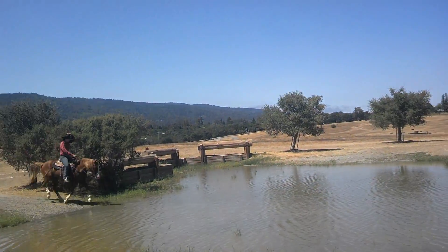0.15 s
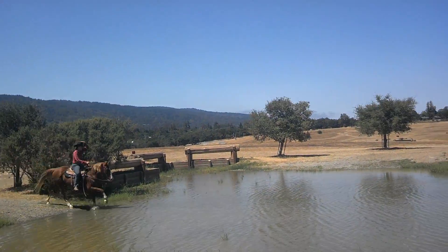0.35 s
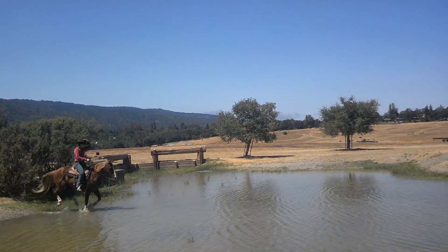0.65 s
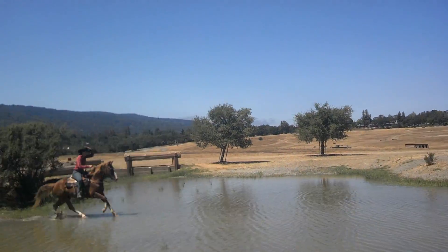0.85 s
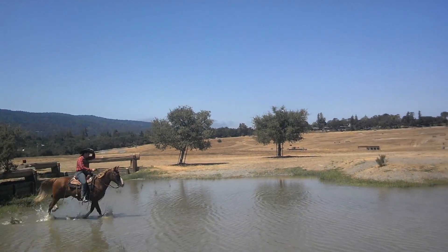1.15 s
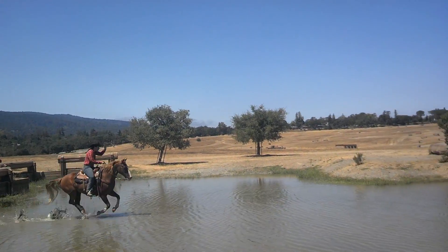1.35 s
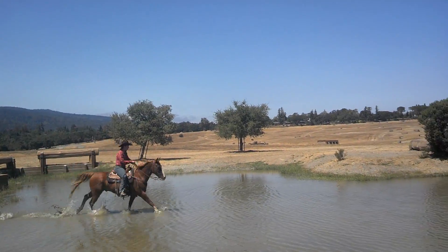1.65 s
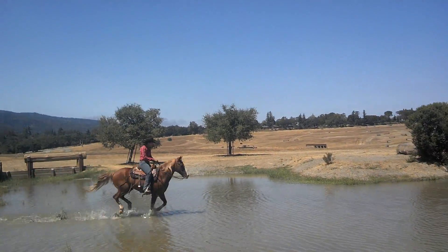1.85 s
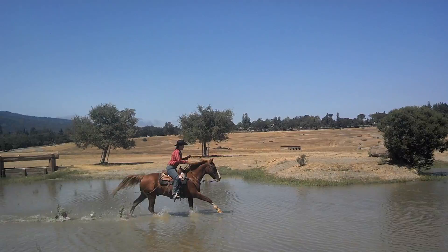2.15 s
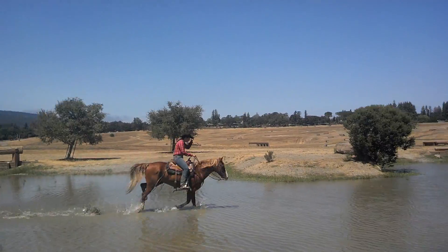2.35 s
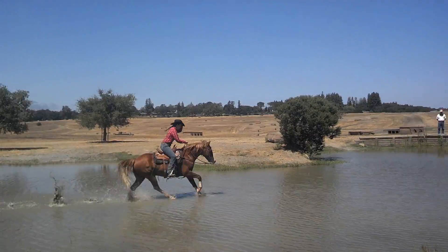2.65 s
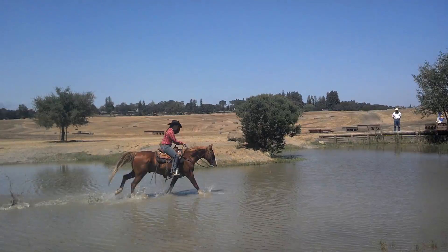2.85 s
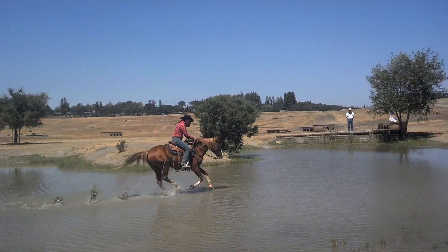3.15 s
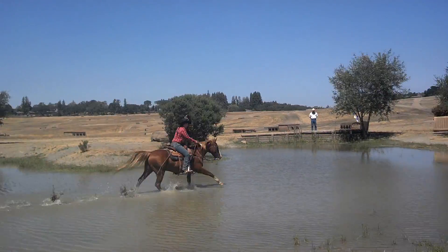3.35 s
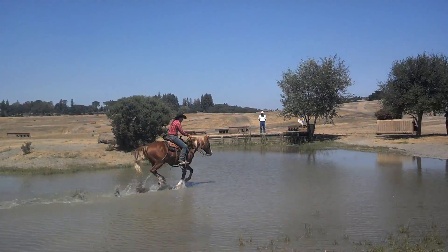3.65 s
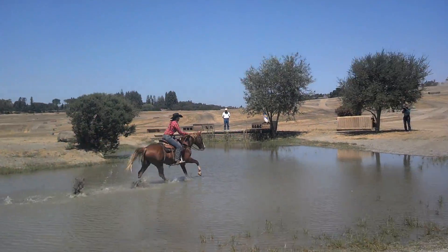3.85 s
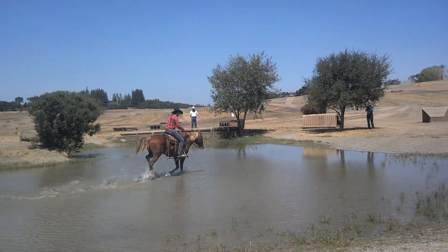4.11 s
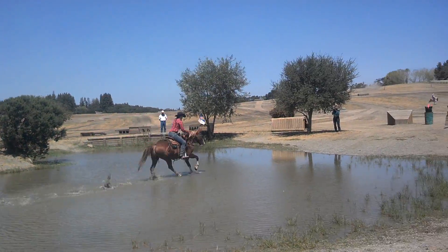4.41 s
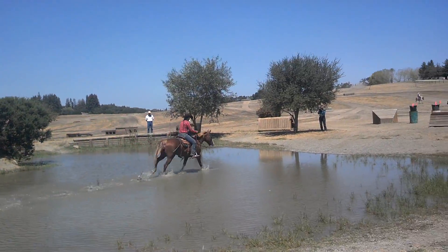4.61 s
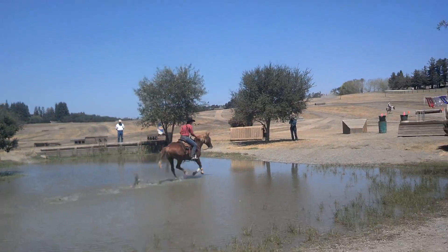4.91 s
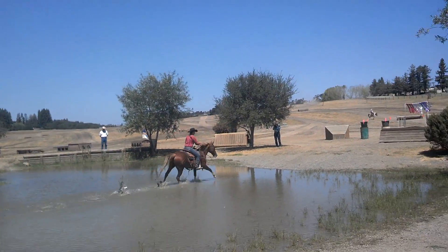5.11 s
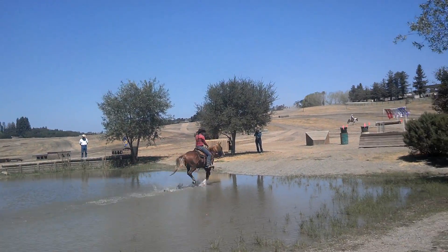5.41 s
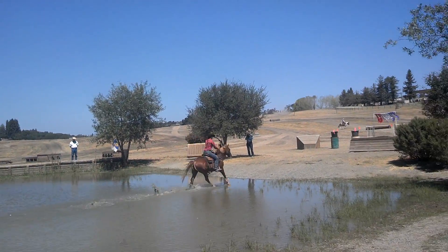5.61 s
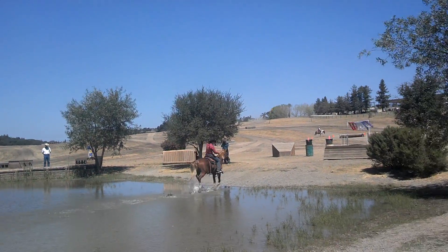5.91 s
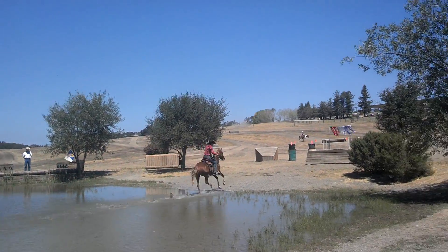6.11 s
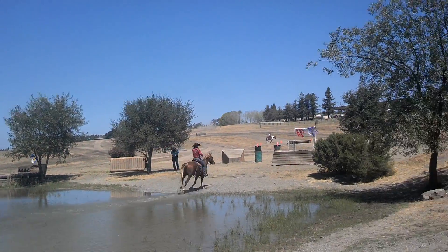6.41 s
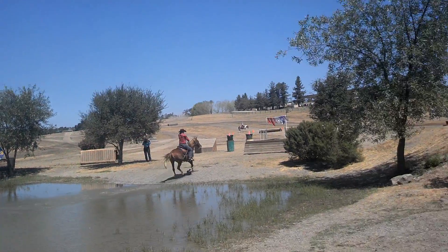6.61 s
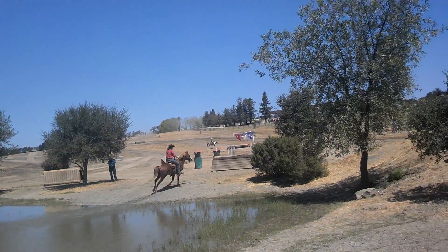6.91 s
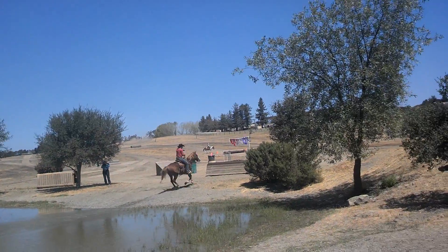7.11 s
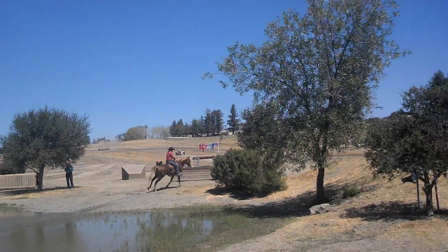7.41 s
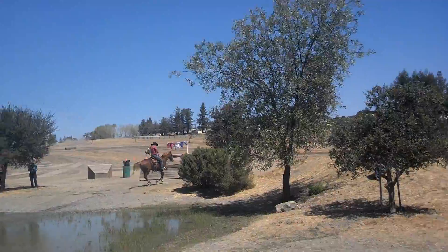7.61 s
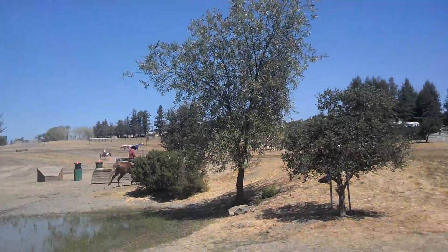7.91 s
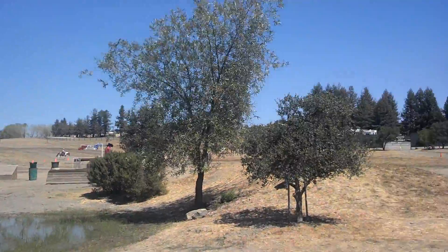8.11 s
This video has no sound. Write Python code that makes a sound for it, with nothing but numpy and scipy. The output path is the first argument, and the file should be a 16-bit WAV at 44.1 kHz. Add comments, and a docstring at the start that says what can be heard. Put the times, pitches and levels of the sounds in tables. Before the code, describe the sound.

Heard from across a pond, hooves thud briefly on the gravel bank, then splash through shallow water with bright cracks, low gulps, dripping bubbles and constant falling droplets. After about six seconds the splashes give way to crunchy gravel steps that soon stop. Low aircraft roar and engine hum persist and grow, with a descending whine. The wide stereo microphone catches small wind buffets.

```python
"""A horse canters through a shallow pond and out over gravel, some way off in an open field.
Hooves slap the water (shaped noise drops), crack flat (short pushes), close air cavities (ringing bubbles);
thrown water rains back as noise and small bubbles. Gravel thuds and crunches before and after the pond.
Behind it a far aircraft (filtered noise, sinking whine) swells over an engine hum, with a brief thin hiss.
Gusts push a two-port microphone, whose stereo is widened by cross-subtraction."""
import sys
import numpy as np
from scipy import signal
from scipy.fft import rfft, irfft, next_fast_len
from scipy.io import wavfile

SR = 44100
rng = np.random.default_rng(int(sys.argv[2]) if len(sys.argv) > 2 else 0)


def put_to_file(sound):
    """Save the sound as 16-bit audio at rate SR, in the file named by the first command-line argument."""
    columns = np.atleast_2d(sound).T  # one column per channel
    safe = np.clip(columns, -1, 1)
    whole_steps = np.round(safe * 32767)
    wavfile.write(sys.argv[1], SR, whole_steps.astype(np.int16))


N = 364213
TIME_S = np.arange(N) / SR


def amp(db):
    """Decibels to gain."""
    return 10 ** (np.asarray(db) / 20)


def evened(x):
    """Scales to rms 1."""
    return x / np.sqrt(np.mean(x ** 2) + 1e-20)


def curves(rows):
    """Each column of a table, interpolated at every sample."""
    s, *columns = np.transpose(rows)
    return [np.interp(TIME_S, s, c) for c in columns]


def band(x, lo_hz, hi_hz, order=3):
    """Causal Butterworth band-pass."""
    sos = signal.butter(order, [lo_hz, hi_hz], "band", fs=SR, output="sos")
    return signal.sosfilt(sos, x)


def drift(rate_hz):
    """Smooth random wander of rms 1, with a Gaussian roll-off at the given rate."""
    size = next_fast_len(N, True)
    hz = np.fft.rfftfreq(size, 1 / SR)
    spectrum = rfft(rng.standard_normal(size)) * np.exp(-(hz / rate_hz) ** 2)
    return evened(irfft(spectrum, size)[:N])


def colour(table, size=2048):
    """Minimum-phase taps for the common and the differing part of the ports' sound."""
    f, *columns = np.transpose(table)
    hz = abs(np.fft.fftfreq(size, 1 / SR)) + 1
    skirt = np.minimum(hz / f[0], 1) ** 2
    log_gain = np.log([skirt * amp(np.interp(np.log(hz), np.log(f), c)) for c in columns])
    return np.fft.ifft(np.exp(np.conj(signal.hilbert(log_gain)))).real


def through(x, taps):
    """Convolves row by row."""
    return signal.oaconvolve(x, taps, axes=-1)[..., :N]


def pair(common, own, likeness):
    """The common part, and a differing part that partly follows it."""
    return np.array([common, likeness * common + np.sqrt(1 - likeness ** 2) * own])


def add(mix, s, sound):
    """Mixes a sound in at s seconds."""
    part = mix[max(round(s * SR), 0):][:len(sound)]
    part += sound[:len(part)]


# open-air spectrum: (frequency [Hz], common level [dB], differing level [dB])
AIR = [(31.7, -16, -21), (66, -35, -29.5), (98.5, -5.5, -23), (155, -14.5, -24.5), (231, -15, -29.5),
       (396, -25.5, -32.5), (643, -30.5, -35.5), (970, -27, -27), (1680, -38, -41), (2170, -43, -39.5),
       (3620, -53.5, -54.5), (6480, -58, -57), (7350, -69.5, -66), (11600, -70, -71), (15000, -64.5, -62)]
# aircraft: (time [s], roar level [dB], upper roar level [dB], share turned a quarter cycle to the right [0-1])
APPROACH = [(0, -6, -6, 0.36), (3.7, -9.5, -10, 0.67), (4.8, -1.5, -2.5, 0.97), (6.1, -2, 3, 1),
            (6.9, 1.6, -1, 0.76), (7.7, 2, 5, 0.52), (8.26, 2.5, 4, 0.4)]
RUMBLE_SHARE, RUMBLE_DB = 0.66, -2  # rumble carries farther, so it follows the approach less


def air():
    """Aircraft rumble and roar: coloured noise leaning right, wavering in the moving air."""
    common, own = rng.standard_normal((2, N))
    near_db, upper_db, from_right = curves(APPROACH)
    # a delay between the ports turns their difference a quarter cycle
    turned = signal.hilbert(common, next_fast_len(N))[:N].imag
    c = np.clip(from_right, 0, 1)
    differing = c * turned + np.sqrt(1 - c ** 2) * own
    noise = through(np.array([common, differing]), colour(AIR))

    low, below = (signal.sosfiltfilt(signal.butter(2, hz, fs=SR, output="sos"), noise) for hz in (400, 1400))
    rumble, roar, upper = amp([RUMBLE_DB + RUMBLE_SHARE * near_db, near_db, upper_db])
    rumbling = low * rumble * amp(0.09 * drift(2.8))
    roaring = (below - low) * roar + (noise - below) * upper
    return rumbling + roaring * amp(.5 * drift(15))


# sinking whine: (time [s], frequency [Hz], level before part levels [dB])
WHINE = [(3.8, 520, -76), (4.6, 516, -51), (5.3, 501, -56.5), (6.35, 490.2, -47), (6.85, 479.2, -43.5),
         (7.3, 472.4, -44), (8.26, 455.7, -48)]
# whine and propeller tones that sink with it: (multiple of whine frequency, relative level [dB])
WHINE_PARTS = [(1, -2), (.587, -.5), (.47, -6), (.704, -16), (.822, -14), (1.174, -17), (.235, -5)]
# engine hum: (time [s], level [dB])
HUM_LEVEL = [(0, -12), (3.2, -12.5), (4.2, -1.5), (6.2, -2.5), (6.9, -16), (8.26, -5)]
# hum lines: (frequency [Hz], relative level [dB])
HUM_LINES = [(118.4, -43.5), (177.6, -38), (355, -55)]
WHINE_RIGHT, HUM_DIFFERING = 0.4, 0.037  # differing part relative to common part


def drones():
    """Aircraft whine sinking in pitch, from the right, over an engine hum: wavering sine partials."""
    hz, db = curves(WHINE)
    phase = 2 * np.pi * np.cumsum(hz * (1 + 0.0038 * drift(8.4))) / SR
    whine = sum(amp(db + part_db + 0.5 * drift(9.3)) * np.exp(1j * k * phase) for k, part_db in WHINE_PARTS)

    clock_s = np.cumsum(1 + 0.0047 * drift(4.8)) / SR
    hum = sum(amp(db + 1.6 * drift(14)) * np.sin(2 * np.pi * hz * clock_s) for hz, db in HUM_LINES)
    hum = hum * amp(curves(HUM_LEVEL)[0])
    return np.sqrt(2) * np.array([whine.real + hum, WHINE_RIGHT * whine.imag + HUM_DIFFERING * hum])


# thin high hiss: (time [s], level [dB])
HISS = [(6.5, -76), (6.65, -60), (6.97, -57), (7.06, -84.5)]


def hiss():
    """A faint narrow band of high noise that comes and goes."""
    noise = evened(band(rng.standard_normal((2, N)), 13900, 15500, order=2))
    return amp(curves(HISS)[0]) * noise


# gusts striking the ports: (time [s], eddy level [dB], scatter of further eddies [s])
GUSTS = [(1.065, -25, 0.082), (1.319, -19, 0.1), (1.428, -23, 0.16), (1.718, -30, 0.19), (2.052, -19, 0.07),
         (2.207, -24, 0.19), (2.361, -20, 0.071), (2.5, -30, 0.42), (4.553, -17, 0.029), (4.659, -20, 0.16),
         (4.87, -21.5, .2), (6.311, -21, .02), (7.035, -21.5, 0.12), (7.349, -30, 0.24), (7.627, -21, 0.12)]
EDDIES_PER_S = 32


def gusts(width_s=0.0042, differing=0.75, common=0.76):
    """A gust is one or more eddies; each gives the ports one short low push of random phase."""
    out, t = np.zeros(N), np.arange(-SR // 30, SR // 30) / SR
    for s, db, length_s in GUSTS:
        eddies = rng.random((1 + int(EDDIES_PER_S * length_s), 3))
        for k, (detune, turn, place) in enumerate(eddies):
            at_s = s + length_s * (place - .5) if k else s  # the first eddy sits on time
            hz = 92 + 70 * detune
            push = np.exp(-abs(t) / width_s) * np.sin(2 * np.pi * (hz * t + turn))
            add(out, at_s + t[0], amp(db) * push)
    return out * np.array([[common], [differing]])


# hoof-falls on the gravel banks: (time [s], grit level before filter [dB], thud level [dB], grit fall [s])
GRAVEL = [(0.035, -46, -31, 0.096), (.07, -45, -37, 0.0043), (0.251, -40.5, -37, 0.029),
          (0.325, -43, -52, .006), (6.472, -36, -41, .004), (6.54, -36, -36, 0.029),
          (6.852, -41, -37, 0.011), (6.893, -41, -30, 0.019), (7.075, -38, -42, .007),
          (7.2, -27.5, -39, 0.0057), (7.219, -34, -38, 0.0083), (7.282, -32.5, -49, 0.003),
          (7.303, -38, -50, .004), (7.413, -41, -35, 0.011)]


def gravel(grit_rise_s=0.0025, thud_fall_s=0.0052):
    """Each hoof on a bank gives a dull thud and a gritty crunch: two bands of enveloped noise."""
    grit, thud, t = np.zeros(N), np.zeros(N), np.arange(SR // 4) / SR
    for s, grit_db, thud_db, grit_fall_s in GRAVEL:
        shape = np.minimum(t / grit_rise_s, np.exp((grit_rise_s - t) / grit_fall_s))
        add(grit, s - grit_rise_s, amp(grit_db) * shape)
        add(thud, s, amp(thud_db) * np.exp(-t / thud_fall_s))
    dull = evened(band(rng.standard_normal((2, N)), 205, 670, order=2)) * np.array([[1], [.4]])
    crunch = band(rng.standard_normal((2, N)) * grit, 1400, 3450, order=1)
    return crunch + dull * thud


# whistles: (time [s], length [s], start frequency [Hz], end frequency [Hz], level [dB])
WHISTLES = [(.474, .021, 5800, 2950, -54), (.483, .031, 8000, 2350, -52)]


def whistles(rough=1.0, waver=0.034, differing=0.7):
    """Thin whistles after the first splash swell, sputter and fade while sliding steeply down."""
    out = np.zeros(N)
    for s, length_s, start_hz, end_hz, db in WHISTLES:
        u = np.arange(0, length_s, 1 / SR) / length_s
        hz = start_hz * (end_hz / start_hz) ** u * (1 + waver * drift(300)[:len(u)])
        tone = np.sin(2 * np.pi * np.cumsum(hz) / SR)
        add(out, s, amp(db) * np.sqrt(np.sin(np.pi * u)) * tone)
    return out * (1 + rough * drift(150)) * np.array([[1], [differing]])


def bubbles(level, lo_hz, hi_hz, per_s, cycles, glide, level_db, count=48):
    """Trapped bubbles ring briefly, rising in pitch as they surface."""
    out, t = np.zeros(N), np.arange(SR // 16) / SR
    for hz in np.geomspace(lo_hz, hi_hz, count):
        age = t * hz / cycles
        phase = 2 * np.pi * hz * t * (1 + glide * np.minimum(age, 4) / 2)
        ring = np.sin(phase) * np.exp(-age)
        for place, size in rng.random((int(per_s * N / SR / count), 2)):
            add(out, place * N / SR, size ** 2 * ring)
    return amp(level_db) * evened(out) * level * np.array([[1], [.7]])


# closing air cavities and larger bubbles: (time [s], level [dB], frequency [Hz])
GULPS = [(.582, -33, 1356), (.674, -41, 1540), (0.785, -24.5, 255), (0.953, -23.5, 265),
         (1.017, -29.5, 556), (1.228, -19.5, 215), (1.241, -34, 920), (1.401, -32, 738), (1.441, -27, 640),
         (1.443, -22, 238), (1.63, -31, 667), (1.826, -25, 260), (1.853, -29.5, 1510), (1.978, -23, 610),
         (2.047, -24, 267), (2.16, -38, 550), (2.207, -34, 730), (2.342, -34, 1450), (2.386, -18.5, 268),
         (2.393, -34, 1491), (2.422, -31.5, 1400), (2.469, -27, 283), (2.545, -34, 610), (2.58, -35, 743),
         (2.626, -34, 1270), (2.760, -25.5, 720), (2.763, -36, 1370), (2.855, -27, 268),
         (2.994, -29.5, 385), (3.128, -30, 790), (3.156, -32, 743), (3.255, -37, 790), (3.347, -23, 700),
         (3.347, -27, 1440), (3.451, -25, 317), (3.973, -28, 289), (3.983, -28.5, 1400),
         (4.168, -27.5, 730), (4.335, -26.5, 332), (4.461, -33.5, 750), (4.612, -25.5, 339),
         (4.701, -25.5, 593), (4.764, -24, 577), (4.784, -21, 276), (4.803, -33, 677), (4.807, -20.5, 191),
         (4.892, -34, 1420), (4.953, -29, 575), (4.97, -24, 261), (5.057, -30, 1515), (5.177, -33.5, 1510),
         (5.22, -34, 610), (5.276, -29, 624), (5.374, -22, 580), (5.43, -34, 1466), (5.491, -32, 1480),
         (5.655, -35, 1314), (5.767, -40, 1420), (5.769, -22, 300), (6.021, -28.5, 1350), (6.238, -31, 660),
         (6.376, -34, 1360)]
GULP_CYCLES, GULP_RING_S = 1.47, 0.0016  # decay: some cycles plus a short time, so big ones ring longer


def gulps(rise_s=0.00419, glide_per_s=2.4, rough=0.26, differing=0.18):
    """The hole punched by a hoof closes and rings as one ragged bubble, rising in pitch."""
    out, t = np.zeros(N), np.arange(SR // 8) / SR
    for s, db, hz in GULPS:
        fall_s = GULP_CYCLES / hz + GULP_RING_S
        shape = (1 - np.exp(-(t / rise_s) ** 2)) * np.exp(-t / fall_s)
        ring = np.sin(2 * np.pi * hz * t * (1 + glide_per_s * (t - 2 * rise_s)))
        add(out, s - rise_s / 2, amp(db) * shape / shape.max() * ring)
    return out * (1 + rough * drift(180)) * np.array([[1], [differing]])


# hooves landing flat: (time [s], level [dB], frequency [Hz])
CRACKS = [(.3740, -19.5, 865), (.5464, -29, 1100), (.9587, -30, 990), (1.4435, -24, 695),
          (1.5765, -29, 1100), (2.0503, -21, 900), (2.072, -21, 1390), (2.158, -26, 1600),
          (2.341, -24, 1400), (2.6292, -25, 786), (2.7152, -21, 1740), (2.7425, -28, 1410),
          (2.8932, -25, 1090), (2.935, -27, 900), (3.2085, -20, 815), (3.3475, -20, 1400),
          (3.4906, -20, 1110), (3.9535, -24, 900), (3.9825, -21, 1410), (4.102, -26, 1080),
          (4.167, -21, 750), (4.338, -26, 890), (4.5178, -28, 1620), (4.5488, -19, 1400),
          (4.7038, -21, 730), (5.0598, -20, 1510), (5.1322, -24, 1900), (5.277, -32, 640),
          (5.6585, -27, 1400), (5.7665, -22.5, 1100), (6.2385, -24, 905)]
CRACK_CYCLES = 0.9
TICK_DB, TICK_FALL_S = -12.5, 0.00034  # level relative to the push


def cracks(differing=0.41, tick_differing=0.8, tick_hz=4300):
    """A flat hoof gives a sudden push that dies within a cycle or two, with a bright tick on top."""
    push, tick, t = np.zeros(N), np.zeros(N), np.arange(SR // 50) / SR
    for s, db, hz in CRACKS:
        add(push, s, amp(db) * np.sin(2 * np.pi * hz * t) * np.exp(-t * hz / CRACK_CYCLES))
        add(tick, s, amp(db + TICK_DB) * np.cos(2 * np.pi * tick_hz * t) * np.exp(-t / TICK_FALL_S))
    return np.array([push + tick, differing * push + tick_differing * tick])


# canter strides, also used by impacts(): (time [s], slap body level [dB], slap spray level [dB],
# slap rise [s], plunge lag [s], plunge level [dB], thrown water level [dB])
STRIDES = [(0.383, -35, -37, 0.0076, 0.026, -40.5, -43.5),
           (0.9593, -32.5, -31.5, 0.0052, 0.057, -41, -38.5),
           (1.576, -30, -33, 0.0058, 0.045, -35.5, -37.5), (2.157, -30, -28, 0.0057, 0.046, -34, -37),
           (2.713, -28.5, -27.5, 0.0034, 0.058, -33.5, -38), (3.304, -30, -31.5, 0.015, 0.09, -40, -44),
           (3.9158, -32.5, -34.5, 0.0059, 0.047, -37, -41),
           (4.5169, -28.5, -30.5, 0.0032, 0.041, -35, -39.5),
           (5.133, -30.5, -30, 0.0041, 0.052, -36.5, -40), (5.768, -27.5, -29.5, 0.0037, 0.012, -31.5, -42),
           (6.373, -29, -34, 0.0069, 0.0059, -39.5, -55)]
FLIGHT_S, SWELL_S, RAIN_END_S, RAIN_FALL_S = 0.13, 0.15, 0.48, 0.092  # airborne, rains back, thins out
FIZZ_DB, FIZZ_RISE_S, FIZZ_FALL_S = -5.5, 0.027, 1  # level relative to thrown water


def falling_water():
    """Power of the water each stride throws up: rain swells, holds and dies over a lingering fizz."""
    power, t = np.zeros(N), np.arange(2 * SR) / SR
    rain = np.clip((t - FLIGHT_S) / SWELL_S, 0, 1) * np.exp(-np.maximum(t - RAIN_END_S, 0) / RAIN_FALL_S)
    fizz = amp(FIZZ_DB) * np.minimum(t / FIZZ_RISE_S, 1) * np.exp(-t / FIZZ_FALL_S)
    for s, *_, thrown_db in STRIDES:
        add(power, s, amp(thrown_db) ** 2 * (rain ** 2 + fizz ** 2))
    return power


# other hooves and landing lumps of water:
# (time [s], body level [dB], spray level [dB], rise [s], fall [s])
SPLASHES = [(.43, -39, -39, .001, .0018), (0.5452, -29, -34.5, 0.0011, 0.0035),
            (0.582, -33, -42, 0.0051, 0.0042), (.66, -48, -49, 0.0042, 0.005),
            (0.808, -34.5, -38, 0.012, 0.042), (1.124, -50, -34.5, 0.0034, 0.0029),
            (1.224, -29, -34.5, 0.0022, 0.0043), (1.412, -33, -36, 0.0059, 0.011),
            (1.442, -28, -33.5, 0.007, 0.0088), (1.71, -32.5, -37.5, 0.0071, 0.0082),
            (1.773, -29, -54, 0.0092, 0.007), (1.854, -30.5, -37, 0.041, 0.017),
            (1.976, -35, -34.5, 0.033, 0.035), (2.072, -41, -49, .0005, 0.0035),
            (2.295, -37.5, -35.5, 0.0071, 0.0098), (2.342, -34.5, -56, .0005, 0.031),
            (2.419, -38, -40, 0.0015, .02), (2.497, -37, -34.5, 0.004, 0.019),
            (2.546, -45, -34.5, .004, 0.014), (2.607, -33.5, -35, .005, 0.011),
            (2.627, -22, -42, 0.0039, 0.0022), (2.745, -29, -35, 0.00063, 0.0061),
            (2.893, -33, -27.5, 0.0008, 0.0024), (2.932, -30.5, -62, 0.0032, 0.012),
            (3.089, -31, -33.5, .006, 0.0091), (3.18, -34.5, -52, .005, .008),
            (3.209, -33, -39.5, .0005, 0.03), (3.256, -32, -43, 0.013, 0.022),
            (3.351, -23, -33, 0.0097, 0.011), (3.387, -32, -38, 0.0044, 0.0054),
            (3.4916, -21.5, -27.5, 0.0005, 0.0024), (3.808, -35, -43.5, .003, 0.038),
            (3.956, -27, -41, 0.0018, .009), (3.983, -32.5, -38.5, .0008, 0.027),
            (4.099, -28.5, -37, 0.0029, 0.0027), (4.168, -31.5, -49, 0.0037, 0.03),
            (4.219, -34, -29.5, 0.003, 0.0039), (4.338, -26, -61, 0.00056, 0.0036),
            (4.445, -37.5, -41, 0.02, 0.016), (4.595, -29.5, -38.5, .003, 0.015),
            (4.705, -28, -38.5, 0.004, 0.0053), (4.785, -31, -42, .003, 0.037),
            (4.892, -32.5, -36.5, 0.0063, 0.0067), (5.06, -28, -37.5, 0.021, 0.014),
            (5.302, -39, -37, 0.0031, 0.0021), (5.334, -40, -37.5, .003, .009),
            (5.38, -32, -36.5, 0.002, 0.014), (5.429, -33, -37, 0.0092, 0.004),
            (5.492, -35, -38.5, 0.0059, 0.018), (5.657, -32.5, -45.5, 0.051, 0.02),
            (6.018, -35.5, -36.5, 0.025, 0.027), (6.092, -29.5, -36, .003, 0.0094),
            (6.123, -36, -40.5, 0.0032, .008), (6.225, -27, -39, 0.0031, 0.0081),
            (6.415, -38.5, -60, 0.0054, 0.022)]
SLAP_FALL_S, PLUNGE_RISE_S, PLUNGE_FALL_S = 0.006, 0.018, 0.021
PLUNGE_SPRAY_DB = -4  # relative to plunge body


def impacts():
    """The leading hoof slaps, then the leg plunges, duller and longer; rows as in SPLASHES."""
    rows = []
    for s, body_db, spray_db, rise_s, lag_s, plunge_db, _ in STRIDES:
        rows.append((s, body_db, spray_db, rise_s, SLAP_FALL_S))
        rows.append((s + lag_s, plunge_db, plunge_db + PLUNGE_SPRAY_DB, PLUNGE_RISE_S, PLUNGE_FALL_S))
    return rows + SPLASHES


RAIN_SPRAY_DB = -4.5  # relative to rain body


def water_motion():
    """Strength of body and spray: each splash swells and dies above the falling water, adding in power."""
    power = amp([[0], [RAIN_SPRAY_DB]]) ** 2 * falling_water()
    t = np.arange(-SR // 8, SR // 4) / SR
    for s, body_db, spray_db, rise_s, fall_s in impacts():
        shape = np.exp(-abs(t) / np.where(t < 0, rise_s, fall_s))
        for row, db in zip(power, (body_db, spray_db)):
            add(row, s + t[0], (amp(db) * shape) ** 2)
    return np.sqrt(power)


def drops(per_s, spread_db, mist):
    """Separate drops of uneven size in a mist of countless tiny ones."""
    size = amp(spread_db * np.minimum(rng.exponential(1, N), 4)) * rng.choice([-1, 1], N)
    landed = rng.random(N) < per_s / SR
    return evened(evened(size * landed) + mist * rng.standard_normal(N))


# splash spectrum, also used by splashing(): (frequency [Hz], common level [dB], differing level [dB])
WATER = [(155, -9, -21), (343, -7.5, -28.5), (403, -21, -10.5), (646, -7.5, -26), (880, -16.5, -15),
         (990, -29.5, -13.5), (1462, -11, -12.5), (1616, -35, -10), (1884, -12, -16.5), (2130, -28.5, -19),
         (3230, -13.5, -11.5), (6800, -18, -17.5), (6520, -21.5, -24), (15000, -24.5, -23)]
# frequency scale of the slopping: (time [s], ratio to WATER)
SLOP_PITCH = [(.4, 1.057), (2.0, 1.05), (3.2, 1.038), (4.2, 1.05), (5.0, 1.02), (6.4, 0.97)]
SLOP_WANDER, SLOP_WANDER_HZ = 0.019, 18  # every lump of water has a size of its own


def slopping(x, split_hz):
    """The low resonances of the water slide up and down: a crossfade between scaled filters."""
    pitch = curves(SLOP_PITCH)[0] * (1 + SLOP_WANDER * drift(SLOP_WANDER_HZ))
    ratios = np.linspace(.84, 1.16, 5)
    out = np.zeros((2, N))
    for ratio, share in zip(ratios, np.eye(len(ratios))):
        taps = colour([(hz * ratio, *db) for hz, *db in WATER])
        strength = np.sqrt(np.sum(band(taps, 360, split_hz) ** 2) / 2)
        low = band(taps, 113, split_hz, order=5) / strength
        out += through(x, low) * np.interp(pitch, ratios, share)
    return out


BOUNCE_S, BOUNCE_GAIN = 0.001486, 0.57  # spray also arrives by way of the ground


def splashing(body, spray, split_hz=2300):
    """Heavy slops make the body, fine drops the spray; both land in lumps."""
    high = band(colour(WATER), split_hz, 21609, order=5)
    high = high + BOUNCE_GAIN * np.roll(high, round(BOUNCE_S * SR), axis=1)
    high = high / np.sqrt(np.sum(high ** 2) / 2)

    slops = pair(*[drops(per_s=500, spread_db=0.5, mist=0.34) for port in range(2)], likeness=0.74)
    fine = pair(*[drops(per_s=1500, spread_db=-0.2, mist=0.62) for port in range(2)], likeness=0.52)
    clumps = drift(30)
    heavy = slops * body * amp(1.16 * clumps - 2.0)
    light = fine * spray * amp(0.59 * clumps - 3.5)
    return slopping(heavy, split_hz) + through(light, high)


def scene():
    """All sources as common and differing parts, then as the two ports."""
    background = air() + drones() + hiss() + gusts()
    body, spray = water_motion()
    plops = bubbles(body, lo_hz=615, hi_hz=1748, per_s=50, cycles=11, glide=0.0414, level_db=-13.5)
    drips = bubbles(spray, lo_hz=2315, hi_hz=7275, per_s=450, cycles=24, glide=0.0084, level_db=-8.5)
    glugs = bubbles(body, lo_hz=247.3, hi_hz=626, per_s=20, cycles=5, glide=0.057, level_db=-13.5, count=16)
    spatter = bubbles(spray, lo_hz=2220, hi_hz=11700, per_s=330, cycles=2.5, glide=0.0089,
                      level_db=-11, count=16)
    water = plops + drips + glugs + spatter + whistles() + gulps() + cracks() + splashing(body, spray)
    common, differing = background + gravel() + water
    return np.array([common + differing, common - differing])


CROSS_SAMPLES, EDGE_HZ = 16, 15650


def treble_notches(ports, notch_hz=135, growth=0.68, shoulder_db=3, shoulder_hz=450):
    """A fixed tone filter: deep, steep-edged treble notches with raised shoulders, staggered between
    sum and difference."""
    size = next_fast_len(N, True)
    hz, spacing_hz = np.fft.rfftfreq(size, 1 / SR), SR / CROSS_SAMPLES
    away_hz = spacing_hz * abs((hz / spacing_hz + np.array([[.5], [0]])) % 1 - .5) + 1
    width_hz = notch_hz * (hz / spacing_hz) ** growth
    shoulder = amp(shoulder_db * np.exp(-(away_hz / shoulder_hz) ** 2))
    gain = shoulder / np.sqrt(1 + (width_hz / away_hz) ** 6)
    treble = np.clip((hz - 1700) / 500, 0, 1)
    turn = np.array([[1, 1], [1, -1]]) / np.sqrt(2)  # ports to sum and difference, and back
    return turn @ irfft(rfft(turn @ ports, size) * gain ** treble, size)[:, :N]


def record(dry):
    """Widening: each port has the other's delayed sound taken from it; then notches and band limits."""
    other = np.pad(dry[::-1], ((0, 0), (CROSS_SAMPLES, 0)))[:, :N]
    wide = treble_notches(dry - .99 * other)
    wide = signal.sosfilt(signal.butter(2, 45, "high", fs=SR, output="sos"), wide)
    lowpass = signal.firwin(511, EDGE_HZ, window=("kaiser", 9), fs=SR)
    return signal.oaconvolve(wide, lowpass[None], "same")


dry = scene()
out = record(dry)
put_to_file(out)
```